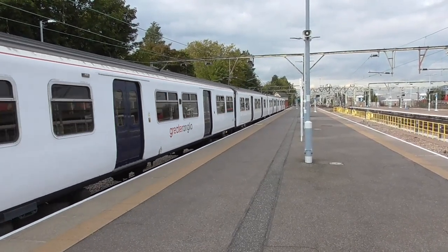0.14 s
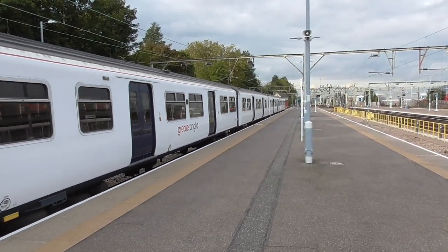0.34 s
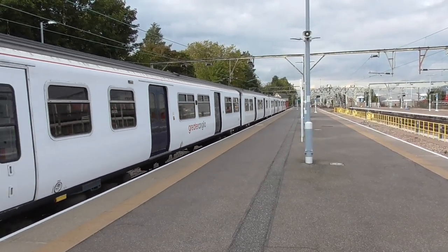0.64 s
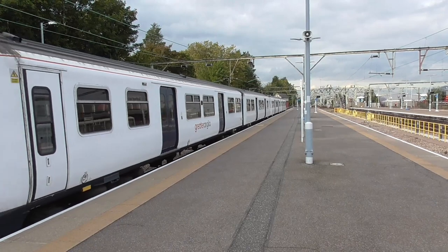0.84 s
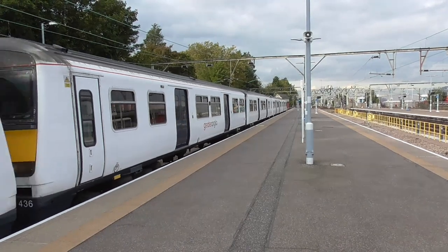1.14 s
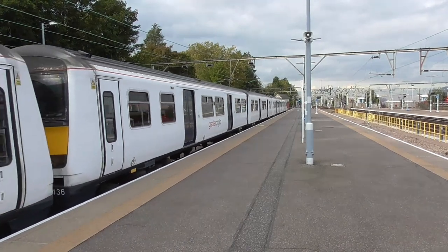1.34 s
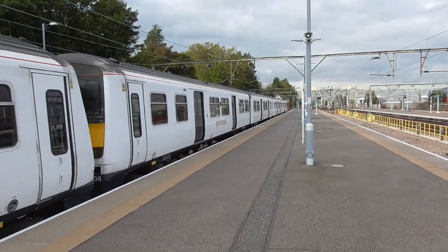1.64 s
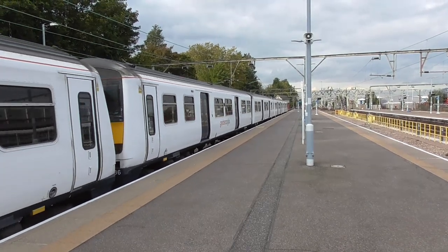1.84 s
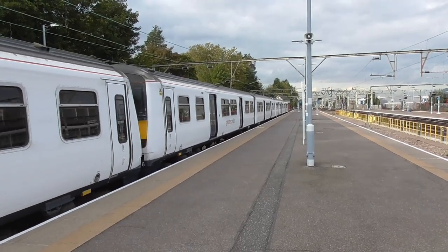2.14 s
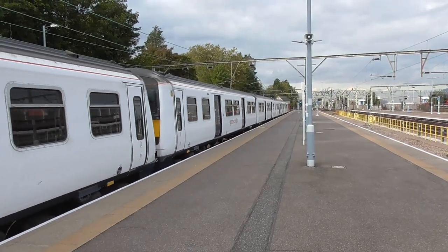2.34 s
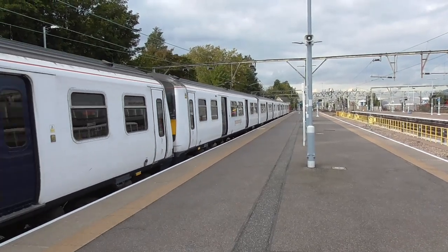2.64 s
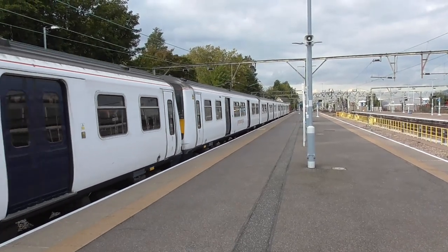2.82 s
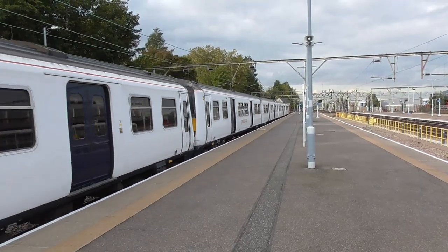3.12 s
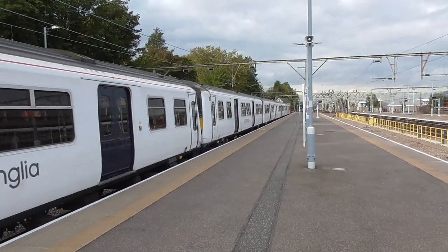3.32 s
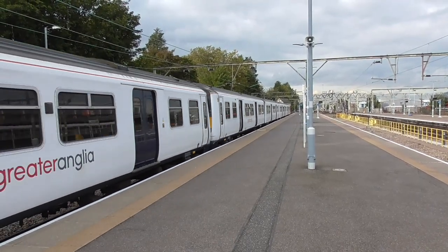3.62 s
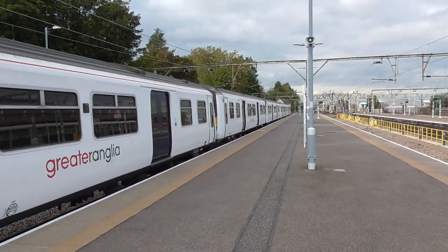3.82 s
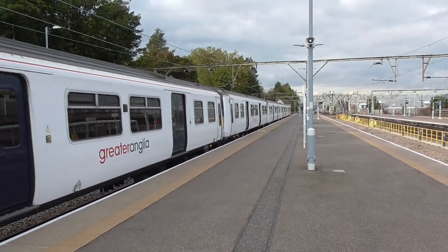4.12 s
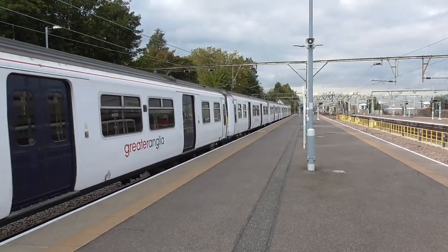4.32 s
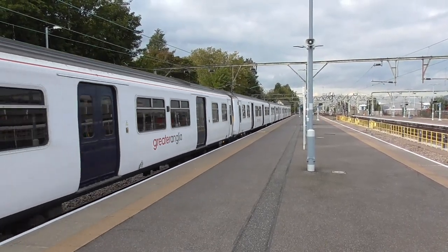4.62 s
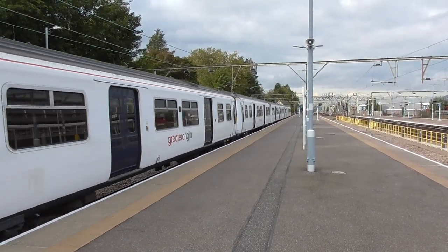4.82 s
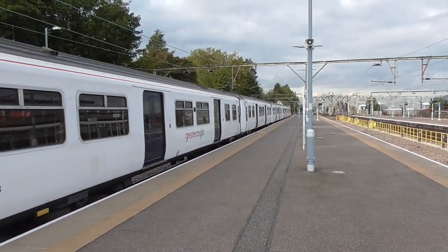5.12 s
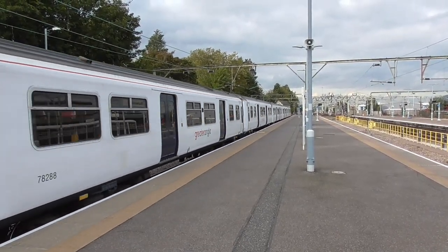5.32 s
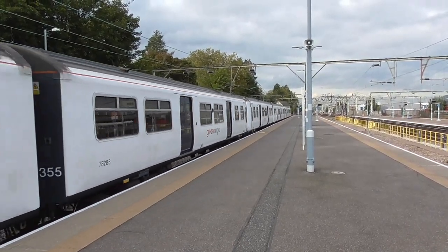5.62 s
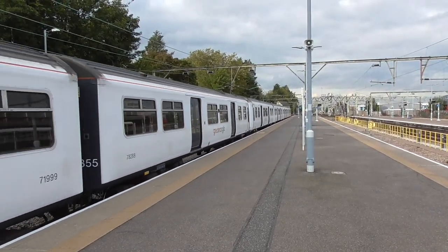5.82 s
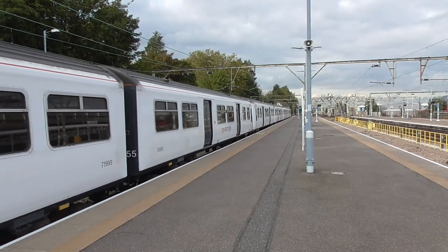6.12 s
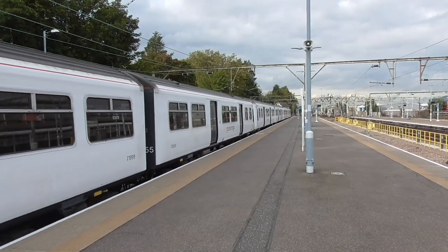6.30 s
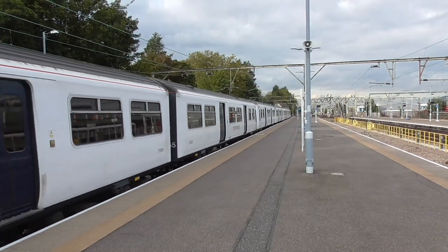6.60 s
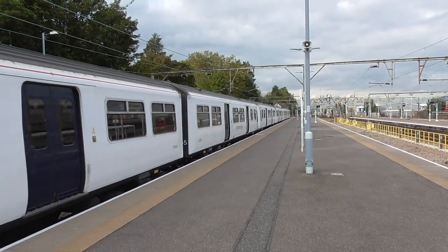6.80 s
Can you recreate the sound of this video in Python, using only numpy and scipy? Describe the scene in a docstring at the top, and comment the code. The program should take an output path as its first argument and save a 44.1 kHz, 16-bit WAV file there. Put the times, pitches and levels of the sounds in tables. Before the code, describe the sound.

An electric train gathers speed past an open platform, wheels thudding over rail joints as a throbbing motor hum climbs through rumble and hiss.

```python
"""An electric train gathers speed along an open platform, passing close on the left.
From the start, noise bands rumble, ring and hiss, and damped sines make the thuds of wheels on rail joints.
Early on, sharp noise snaps like sparks, clunks, bogie judder and a faint wheel note join in.
The motors' hum, a stack of tones on one pitch curve, climbs throughout. Late on it throbs and swells;
the brightest snap cuts through just before the end, as the motor car draws level."""
import sys
import numpy as np
from scipy import signal
from scipy.fft import rfft, irfft, next_fast_len
from scipy.io import wavfile
from scipy.ndimage import uniform_filter1d, map_coordinates

SR = 44100
rng = np.random.default_rng(int(sys.argv[2]) if len(sys.argv) > 2 else 0)


def waveform_to_disk(signal):
    """Save audio, clipped to [-1, 1], as 16-bit WAV at the path in sys.argv[1]."""
    frames = np.transpose(np.atleast_2d(signal))
    scaled = np.clip(frames, -1, 1) * 32767
    samples = np.round(scaled).astype(np.int16)
    wavfile.write(sys.argv[1], SR, samples)


N = 306936

MOTOR_CAR_S, MOTOR_CAR_WIDTH_S = 6.96, 0.82  # when the motor car draws level, and how long it stays close
# half the left-right difference goes to each port: left, right [share]
SIDES = np.array([[.5], [-.5]])


def amp(db):
    """Decibels to gain."""
    return 10 ** (np.asarray(db) / 20)


def unit(x):
    """Scale to rms 1."""
    return x / np.sqrt(np.mean(x ** 2) + 1e-20)


def along(points, hz):
    """Read (frequency, value) points on a log frequency axis."""
    f, v = np.transpose(points)
    return np.interp(np.log(hz + 1), np.log(f + 1), v)


def curves(rows):
    """One value per sample for each column after the time."""
    s, *cols = np.transpose(rows)
    return [np.interp(np.arange(N) / SR, s, c) for c in cols]


def wobble(rate):
    """A smooth random curve, rate knots a second."""
    at = np.arange(N) * rate / SR
    coarse = at[::64]
    knots = rng.standard_normal(int(at[-1]) + 4)
    return np.interp(at, coarse, map_coordinates(knots, [coarse]))


def filtered(x, response):
    """Shape x by a complex response of frequency."""
    m = next_fast_len(N + SR // 4)
    return irfft(rfft(x, m) * response(np.fft.rfftfreq(m, 1 / SR)), m)[..., :N]


# how much the two ports share of the train's noise: freq_hz, likeness [correlation]
TRAIN_ALIKE = [(30, .75), (70, .95), (160, .96), (330, .88), (600, .82), (2000, .74), (3500, .52),
               (5500, .15), (8500, .42), (13000, .1)]


def rush(spectrum, alike=TRAIN_ALIKE):
    """Coloured stereo noise of rms 1; the mid-side balance sets how much the two ports share."""
    def colour(hz):
        turn = np.arccos(np.clip(along(alike, hz), -1, 1)) / 2
        return amp(along(spectrum, hz)) * [np.cos(turn), np.sin(turn)]

    mid, side = filtered(rng.standard_normal((2, N)), colour)
    return unit(np.array([mid + side, mid - side]))


def tone(hz, blur, rate):
    """A stereo line of rms 1 on a pitch curve; shifting reflections blur its level and phase."""
    scatter = lambda: wobble(rate) + 1j * wobble(rate)
    paths = 1 + blur * (scatter() + SIDES / 2 * scatter())  # each port hears slightly different paths
    cycles = np.cumsum(hz) / SR + rng.random()
    return unit(np.real(paths * np.exp(2j * np.pi * cycles)))


def add(track, s, sound):
    """Mix a sound into a track at time s."""
    room = track[..., round(s * SR):][..., :sound.shape[-1]]
    room += sound[..., :room.shape[-1]]


def swell(s, width):
    """A smooth rise to 1 at time s and a fall to nothing."""
    return np.exp(-((np.arange(N) / SR - s) / width) ** 2)


def nearness(s, width):
    """Inverse-square curve of a passing source, 1 when it is closest at time s."""
    return 1 / (1 + ((np.arange(N) / SR - s) / width) ** 2)


def patchy(x, depth_db, size=512):
    """Flicker a noise patch by patch in time and pitch; a larger size gives narrower, longer patches."""
    z = signal.stft(x, nperseg=size)[2]
    field = uniform_filter1d(rng.standard_normal(z.shape[1:]), size=3, axis=0)  # across frequency
    field = uniform_filter1d(field, size=9, axis=1)  # along time
    return unit(signal.istft(z * amp(depth_db * unit(field)), nperseg=size)[1][:, :N])


# the train's speed, read from the motor hum: time_s, pitch_hz
HUM_PITCH = [(0, 69.24), (2.7, 91.6), (3.8, 100.5), (5.2, 111.7), (6.1, 121.2), (6.45, 122.7), (6.7, 125),
             (6.96, 127.1)]


def doublings():
    """How many times the speed has doubled since the start, as the hum's pitch follows it."""
    pitch, = curves(HUM_PITCH)
    return np.log2(pitch / pitch[0])


CREST_CYCLES, REPEAT_CYCLES = 0.97, 2.085  # cycles from a thud's start to its envelope crest, and to its repeat
CONTACT_LAG_S = 0.005  # from the drop to the hard contact
SHUDDER_T60_S = 0.37  # how long the car body rumbles after a thud
# thuds of wheels on rail joints, some of them later rebounds; each row is followed by one repeat.
# Before the low cut: start_s, level_db [envelope peak], thud_hz,
# clank_db, repeat_db, shudder_db [all three against level_db]
JOINT_THUDS = [(0.082, -14, 145, -19.5, -4, -20), (0.963, -15, 130, -30, -16, -22),
               (1.612, -8, 200, -17, -6, -14), (2.26, -9.5, 191, -19.5, -20, -22),
               (3.05, -9.5, 186, -12.5, -8, -22), (3.621, -12, 188, -15.5, -11, -16),
               (3.711, -8.5, 142, -26, 1.5, -16), (4.253, -9.5, 141, -28, 4, -17.5),
               (4.34, -15.5, 150, -12, -15, -17), (4.461, -14.5, 240, -13, -8, -21),
               (4.923, -8, 148, -23, -3.5, -11), (4.954, -18.5, 202, -20, -9, -5),
               (5.419, -7, 150, -33, 3, -11), (5.483, -13.5, 186, -20, -5, -17),
               (5.899, -8, 200, -16, -3, -17), (6.363, -9, 178, -17, -10, -26),
               (6.931, -8.5, 166, -33, -14, -29), (6.953, -4.5, 200.5, -26, -20, -17)]
# the wheelset's modes: pitch_hz [mean], level_db [against the clank], t60_s
WHEELSET_MODES = [(392, -7, 0.04), (550, -10, 0.06), (675, -10.5, 0.069), (860, -10, 0.032),
                  (1080, -14, 0.04), (1550, -27, 0.025)]
# loose running gear, before the low cut: start_s, ring_hz, level_db
GEAR_CLUNKS = [(0.856, 345, -19.5), (1.515, 352, -17), (1.599, 795, -27.5), (3.61, 421, -17),
               (4.842, 426, -15.5), (5.349, 327, -21), (5.82, 543, -30.5), (5.882, 431, -18)]
# clank of a struck wheel: freq_hz, density_db [relative, per Hz]
CLANK_SPECTRUM = [(25, -51), (90, 0), (170, -10), (400, 6.5), (850, -11.5), (1500, -31.5), (4100, -49),
                  (4700, -36), (5400, -46), (10000, -61)]
# the car body's boom: freq_hz, density_db [relative, per Hz]
BODY_BOOM_SPECTRUM = [(45, -36), (85, -35), (130, 5.5), (185, -0.5), (250, 2), (320, -11), (520, -41),
                      (1200, -120)]


def joints(clank_t60, ring_t60, low_cut_hz):
    """Wheels thud on joints, each thud with one repeat: the damped track rocks, the steel above rings."""
    thuds, shake, shudder = np.zeros((3, N))
    t = np.arange(SR // 4) / SR
    soft = 1 - np.exp(-(t / .003) ** 2)  # rounded onset
    decay = lambda db, t60: amp(db - 60 * t / t60)
    for s, db, hz, clank_db, repeat_db, shudder_db in JOINT_THUDS:
        u = t * hz / CREST_CYCLES
        thud = -amp(db) * (u * np.exp(1 - u)) ** 3 * np.sin(2 * np.pi * hz * t)
        add(thuds, s, thud)
        add(thuds, s + REPEAT_CYCLES / hz, amp(repeat_db) * thud)
        modes = np.zeros(len(t))
        for mode_hz, level, t60 in WHEELSET_MODES:
            struck_hz = mode_hz * rng.normal(1, 0.038)  # each row rings a little differently
            modes += decay(level, t60) * np.sin(2 * np.pi * struck_hz * t)
        add(thuds, s + CONTACT_LAG_S, amp(db + clank_db) * modes)
        add(shake, s, soft * decay(db + clank_db, clank_t60))
        add(shudder, s, soft * decay(db + shudder_db, SHUDDER_T60_S))
    for s, hz, db in GEAR_CLUNKS:
        add(thuds, s, soft * decay(db, ring_t60) * np.sin(2 * np.pi * hz * t))
    radiated = lambda hz: (1j * hz / (low_cut_hz + 1j * hz)) ** 2  # slow rocking moves little air
    return filtered(thuds, radiated) + shake * rush(CLANK_SPECTRUM) + shudder * rush(BODY_BOOM_SPECTRUM)


HUM_RISE_DB = 30.5  # growth of the distant hum per doubling of speed
DRONE_ORDER, GEAR_ORDER = 3, 5  # multiples of the hum pitch
FAN_WAVER = .01  # the fan's pitch wander, as a share of its pitch
# low orders, each beamed its own way: order [multiple of the pitch],
# far_db [at the mean of the speed curve], crest_db [added swell], crest_s, width_s [half width]
HUM_ORDERS = [(1, -48.5, -36, 5.76, 0.75), (2, -43.5, -22.5, 6.81, 0.16), (4, -48, -33, 6.68, 0.52)]
# the hum's strongest order, before a 2.5 dB lift: time_s, level_db
DRONE_LEVEL = [(0.0, -41.5), (1.2, -55), (1.65, -38.5), (2.15, -48), (2.45, -37.5), (2.85, -39),
               (3.3, -38.5), (3.8, -35.5), (4.15, -43.5), (4.62, -32.5), (5.1, -40), (5.45, -42),
               (5.8, -28.5), (6.05, -31.5), (6.2, -26.5), (6.45, -22), (6.75, -30), (6.96, -33)]
# high orders, before the lift and swell of the motor car: order [multiple of the pitch], level_db
HUM_OVERTONES = [(5, -56), (6, -44), (7, -48.5)]
# lines near the low orders: some make the hum throb, the 1.97 one is an earlier swell of the second order:
# order [multiple of the pitch], level_db [at the crest], crest_s, width_s [half width]
NEARBY_LINES = [(1.82, -34.5, 6.55, 0.35), (1.97, -24, 6.41, 0.12), (2.15, -30, 5.85, 0.11),
                (2.18, -34, 6.6, 0.35), (2.93, -38, 6.85, 0.15), (3.17, -23.5, 6.45, 0.12)]
# the rough fifth order: time_s, level_db
GEAR_LEVEL = [(0, -52), (2.2, -64), (3.1, -44), (3.6, -42), (4.3, -45), (4.85, -38.5), (5.5, -46.5),
              (6.96, -35)]
# gearcase noise: freq_hz, density_db [relative]
GROWL_SPECTRUM = [(300, -43), (480, 0.5), (700, -3), (880, -2), (1150, -8), (1800, -44), (4000, -120)]
# the motors shake the floor above them: freq_hz, density_db [relative, per Hz]
FLOOR_SPECTRUM = [(35, -31), (60, -7), (78, 2), (105, -25), (150, -3), (210, -2), (270, -10), (340, -50),
                  (600, -120)]
# cooling fan: time_s, pitch_hz [before the waver], level_db
FAN_WHINE = [(0, 2215, -72), (3, 2234, -60), (4.2, 2231, -61.5), (5.3, 2161, -56), (6, 2140, -60.5),
             (6.96, 2133, -61)]


def motors():
    """The hum climbs with the speed; low orders swell as their beams sweep by, reflections blur them."""
    pitch, = curves(HUM_PITCH)
    drone_db, = curves(DRONE_LEVEL)
    gear_db, = curves(GEAR_LEVEL)
    fan_hz, fan_db = curves(FAN_WHINE)
    near_db = 10 * np.log10(nearness(MOTOR_CAR_S, MOTOR_CAR_WIDTH_S))
    speed = doublings()
    effort_db = HUM_RISE_DB * (speed - speed.mean())
    diffuse = 0.2 * amp(-.35 * near_db).clip(0, 2)  # from afar, more of the hum arrives by reflections
    order = lambda k: tone(k * pitch, blur=diffuse * np.sqrt(k), rate=7 * k)

    low = sum((amp(far_db + effort_db) + amp(crest_db) * nearness(s, width)) * order(k)
              for k, far_db, crest_db, s, width in HUM_ORDERS)
    drone = amp(drone_db + 2.5) * order(DRONE_ORDER)
    high = sum(amp(db) * tone(k * pitch, blur=2.4, rate=45) for k, db in HUM_OVERTONES)
    high = amp(near_db + 3.5) * high
    nearby = sum(amp(db) * nearness(s, width) * order(k) for k, db, s, width in NEARBY_LINES)
    gears = amp(gear_db) * tone(GEAR_ORDER * pitch, blur=4.9, rate=45)
    growl = amp(near_db - 48.0) * rush(GROWL_SPECTRUM)
    floor = amp(near_db - 36.0) * rush(FLOOR_SPECTRUM)
    fan = amp(fan_db) * tone(fan_hz * (1 + FAN_WAVER * wobble(25)), blur=1.8, rate=150)
    return floor + drone + low + nearby + high + gears + growl + fan


WEBS_DB, WEBS_RISE_DB = -18, 3  # the discs' ring against the rails at the start, and its growth per doubling
ROAR_FLUTTER_DB, HISS_FLUTTER_DB = 1.0, .45
RAILS_PATCHY_DB, HISS_PATCHY_DB = 1.4, 1.8  # depth of the flicker
# the bogies under two car ends roll by: crest_s, width_s [half width]
BOGIE_PASSES = [(1.42, 0.77), (5.3, 1.3)]
# rolling layers, one row each: start_db, speed_db [rise per doubling of speed],
# bogie_db [swell beside a bogie], motor_db [swell beside the motor car]
RUMBLE_LEVEL = (-38, 3, 6, 2.5)
ROAR_LEVEL = (-33.5, 4, 0.36, 6.5)
RAILS_LEVEL = (-42.5, 4.5, 1.06, 1.5)
HISS_LEVEL = (-61.5, 7, 2.5, 3)
FIZZ_LEVEL = (-64, 6, 2, 4.5)
# their colours, and the wheel discs' higher ring (webs): freq_hz, density_db [relative, per Hz]
RUMBLE_SPECTRUM = [(13, -69), (22, -35), (32, -37), (34, -18), (39, -33), (50, -6), (102, 2.5), (123, 3.5),
                   (157, -1), (220, -3.5), (290, -26), (480, -120)]
ROAR_SPECTRUM = [(140, -24), (215, -0.5), (274, 2), (301, 0), (350, 1), (398, -2.5), (640, -11.5),
                 (830, -27), (1410, -120)]
RAILS_SPECTRUM = [(380, -35), (640, -6), (718, 0), (872, 0.5), (978, -3), (1060, -2.5), (1380, -14),
                  (1610, -15), (1780, -25.5), (2000, -19), (2600, -35.5), (4400, -120)]
WEBS_SPECTRUM = [(1200, -29), (1550, 1), (1800, -3), (2020, 0), (2200, 0), (2400, -6.5), (2650, -22),
                 (3500, -62)]
HISS_SPECTRUM = [(1410, -23), (2400, -2.5), (2680, -4.5), (2950, -4), (3780, -4), (4250, -7), (4580, -5.5),
                 (5000, -8.5), (5760, -11), (6800, -10.5), (8840, -44), (15000, -120)]
FIZZ_SPECTRUM = [(3820, -40), (6500, -15), (6980, 0.5), (8910, 2.5), (13600, -8.5), (14900, -14),
                 (15800, -18)]


def rolling():
    """Rough treads shake cars, wheels and rails: louder with speed and beside each bogie, each fluttering."""
    speed, motor_car = doublings(), nearness(MOTOR_CAR_S, MOTOR_CAR_WIDTH_S)
    bogie = sum(swell(s, width) for s, width in BOGIE_PASSES)

    def gain(level, flutter_db, rate):
        start_db, speed_db, bogie_db, motor_db = level
        level_db = start_db + speed_db * speed + bogie_db * bogie + motor_db * motor_car
        return amp(level_db + flutter_db * wobble(rate))

    rumble = gain(RUMBLE_LEVEL, 0.19, 9.5) * rush(RUMBLE_SPECTRUM)
    roar = gain(ROAR_LEVEL, ROAR_FLUTTER_DB, 10) * rush(ROAR_SPECTRUM)
    steel = rush(RAILS_SPECTRUM) + amp(WEBS_DB + WEBS_RISE_DB * speed) * rush(WEBS_SPECTRUM)
    ring = gain(RAILS_LEVEL, 0.53, 18) * patchy(steel, RAILS_PATCHY_DB, size=1536)
    hiss = gain(HISS_LEVEL, HISS_FLUTTER_DB, 10) * patchy(rush(HISS_SPECTRUM), HISS_PATCHY_DB)
    fizz = gain(FIZZ_LEVEL, HISS_FLUTTER_DB, 23) * patchy(rush(FIZZ_SPECTRUM), HISS_PATCHY_DB)
    return rumble + roar + ring + hiss + fizz


# judder bouts: crest_s, level_db, width_s [half width]
JUDDER_BOUTS = [(0.845, -28, 0.034), (1.0, -33, 0.058), (1.33, -32.5, 0.056), (1.57, -40, 0.054),
                (1.655, -36, 0.026), (2.86, -37.5, 0.038), (3.62, -32, 0.038), (5.35, -26.5, 0.045),
                (5.87, -27, 0.067)]
# the bogie frame's ring: freq_hz, density_db [relative, per Hz]
FRAME_SPECTRUM = [(130, -25), (220, -7), (280, -4), (360, -1), (470, -5), (620, -15.5), (950, -21),
                  (1600, -55), (3000, -120)]


def rattles():
    """A bogie frame judders in short bouts on uneven track."""
    bouts = sum(amp(db) * swell(s, width) for s, db, width in JUDDER_BOUTS)
    return bouts * unit(amp(1.1 * wobble(90)) * rush(FRAME_SPECTRUM))


# a wheel's note: crest_s, level_db, width_s [half width]
WHEEL_NOTES = [(1.15, -46.5, 0.28), (2.0, -44.5, 0.21), (3.4, -63, 0.68), (5.2, -43.5, 0.22)]


def singing_wheel(hz):
    """A wheel rings faintly now and then as it rubs the rail."""
    level = sum(amp(db) * swell(s, width) for s, db, width in WHEEL_NOTES)
    return level * tone(np.full(N, hz), blur=1.0, rate=45)


SIZZLE_FLUTTER_DB = 2.0
# snaps, the base level of crack, sizzle and ring: start_s, level_db, fade_s [sizzle's fall to 1/e]
SNAP_EVENTS = [(.49, -57, .05), (1.088, -59, 0.044), (1.253, -60, .03), (1.315, -62, .05),
               (2.465, -62, 0.018), (3.39, -61, 0.015), (3.718, -54, 0.033), (4.642, -55, 0.016),
               (4.93, -56, 0.12), (6.753, -29, 0.026)]
# colours of the crack, the sizzle and the shaken metal fitting: freq_hz, density_db [relative, per Hz]
CRACK_SPECTRUM = [(2000, -36), (3700, -16), (6000, -14), (7100, -1), (8500, 3), (9800, -5), (13400, -10),
                  (15800, -18)]
SIZZLE_SPECTRUM = [(1530, -34), (2600, -19), (3740, -9), (4800, -10), (6010, -13), (7100, 3), (9670, 7.5),
                   (13400, -1), (15800, -11)]
FITTING_SPECTRUM = [(500, -25), (1100, 13), (1700, -9), (3000, -5), (4500, -4), (6000, -13), (9000, -45)]
# how much the two ports share of crack and sizzle: freq_hz, likeness [correlation]
SNAP_ALIKE = [(6000, 1), (8000, 0.4), (10500, 0.74), (12000, 0.59)]


def snaps(crack_s, crack_db, body_db, body_fade_s):
    """A bright crack, then a broader sizzle that dies away over the dull ring of a metal fitting."""
    cracks, sizzles, rings = np.zeros((3, N))
    t = np.arange(SR // 2) / SR
    rise = 1 - np.exp(-t / .0015)
    for s, db, fade in SNAP_EVENTS:
        crack = min(1, 0.01 / fade) * np.exp(-((t - .0036) / crack_s) ** 2)  # long sizzles start softer
        add(cracks, s, amp(db + crack_db) * crack)
        add(sizzles, s, amp(db + 1.0) * rise * np.exp(-t / fade))
        add(rings, s, amp(db + body_db) * rise * np.exp(-t / body_fade_s))
    sizzles = sizzles * amp(SIZZLE_FLUTTER_DB * wobble(200))
    bright = cracks * rush(CRACK_SPECTRUM, SNAP_ALIKE) + sizzles * rush(SIZZLE_SPECTRUM, SNAP_ALIKE)
    return bright + rings * rush(FITTING_SPECTRUM)


# port phase: freq_hz, lead_rad [how far the left port leads]
LEFT_LEAD = [(30, 0), (250, .3), (550, .7), (1700, .55), (3000, .9), (4800, 1.9), (6200, .4), (9000, 2.6),
             (11500, 2.8), (15000, 5.4)]
# port balance of the running gear, then of the snaps: freq_hz, lean_db [left minus right]
TRAIN_LEAN = [(60, 3), (130, -1), (250, 0), (500, 1.5), (1200, 5), (2400, 3.5), (4400, 3.5), (8200, 1.5),
              (14000, -2.5)]
SNAP_LEAN = [(3000, 2), (5200, 10), (8200, -5), (10500, 3), (13500, -8), (15500, -5)]


def from_left(x, lean):
    """The left port leads in phase, and the level balance between the ports varies with frequency."""
    return filtered(x, lambda hz: amp(SIDES * along(lean, hz)) * np.exp(1j * SIDES * along(LEFT_LEAD, hz)))


def scene():
    """The running gear and motors share one stereo balance; the snaps have their own."""
    wheels = joints(clank_t60=0.2, ring_t60=0.15, low_cut_hz=75.0) + rolling()
    wheels = wheels + rattles() + singing_wheel(hz=1044.0)
    sparks = snaps(crack_s=0.0019, crack_db=10.5, body_db=-12, body_fade_s=0.063)
    return from_left(wheels + motors(), TRAIN_LEAN) + from_left(sparks, SNAP_LEAN)


def record(dry):
    """A sharp band limit removes everything from 15.7 kHz up."""
    return filtered(dry, lambda hz: hz < 15700)


dry = scene()
out = record(dry)
waveform_to_disk(out)
```